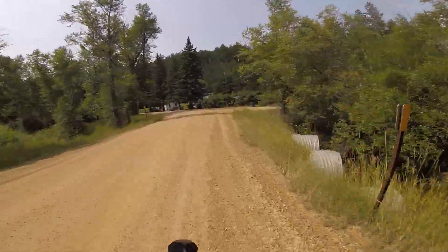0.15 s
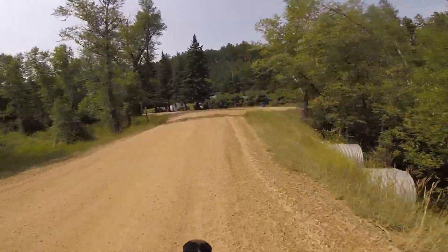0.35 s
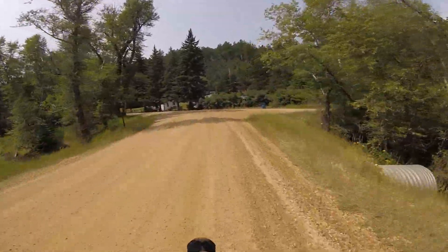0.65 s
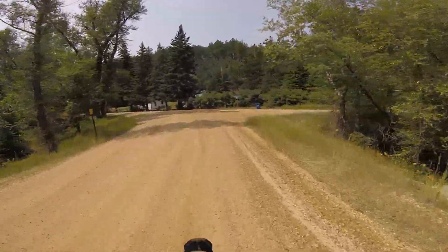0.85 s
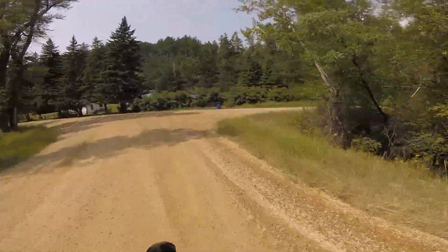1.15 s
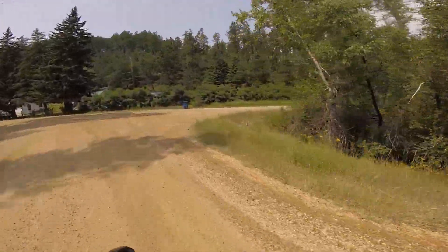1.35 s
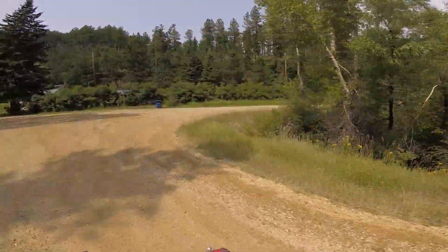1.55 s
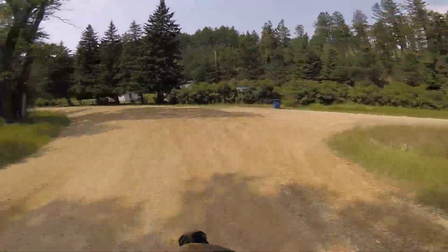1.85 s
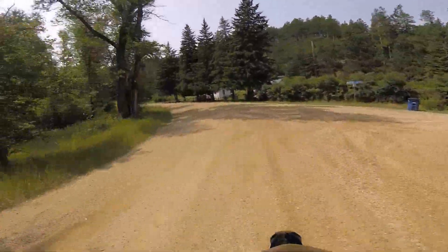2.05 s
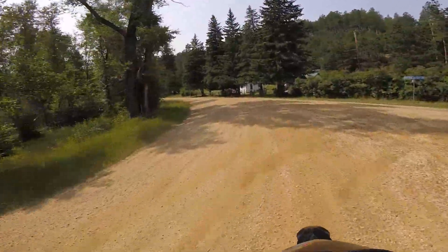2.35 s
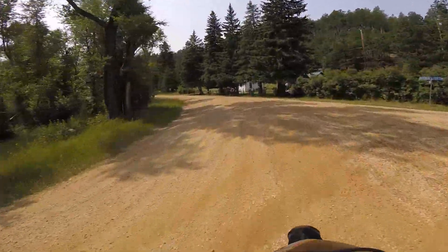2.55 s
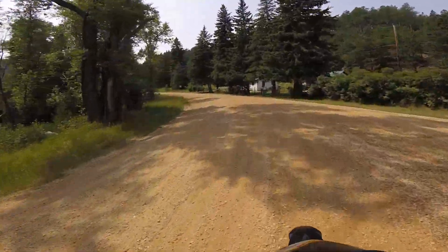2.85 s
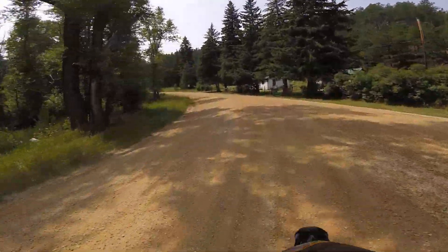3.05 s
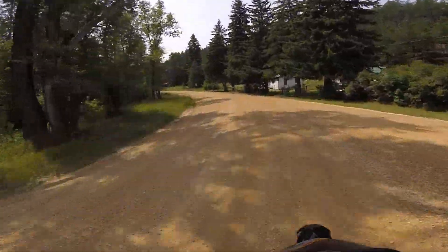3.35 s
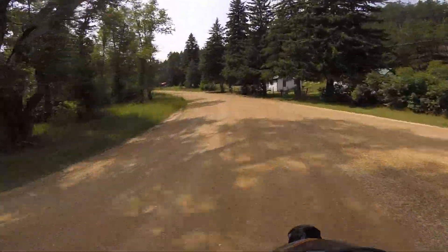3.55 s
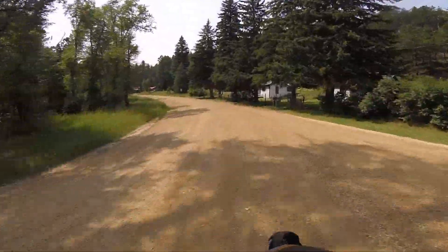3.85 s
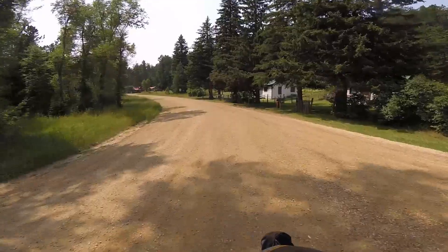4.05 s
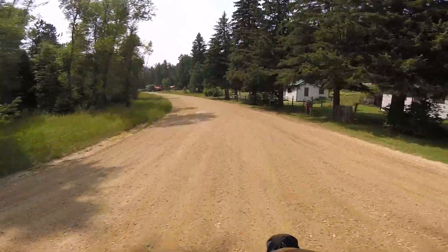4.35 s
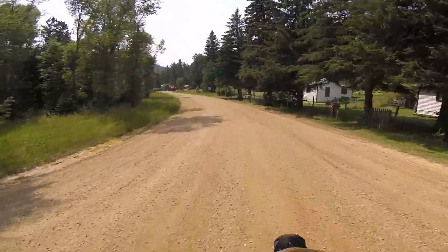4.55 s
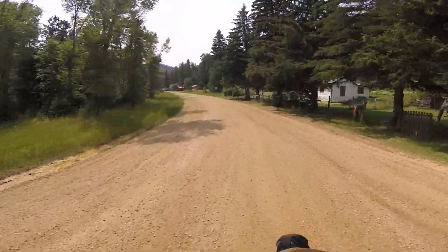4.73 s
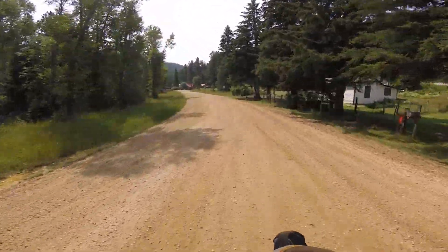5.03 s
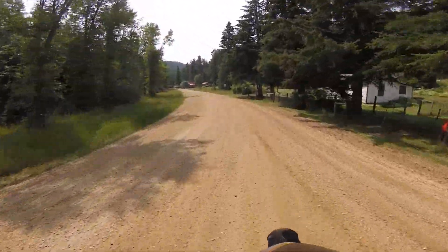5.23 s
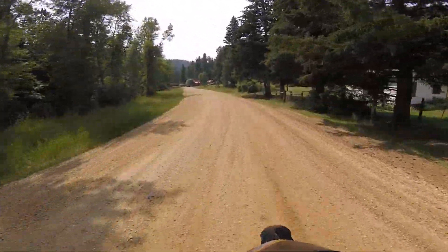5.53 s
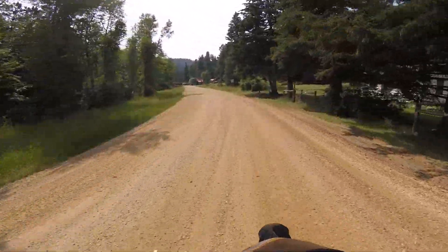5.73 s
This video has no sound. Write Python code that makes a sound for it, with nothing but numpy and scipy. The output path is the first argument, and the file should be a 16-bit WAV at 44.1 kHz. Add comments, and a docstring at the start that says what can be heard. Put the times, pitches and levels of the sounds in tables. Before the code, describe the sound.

A single-cylinder motorcycle runs along a gravel road, heard close from the rider, with engine clatter, a soft tyre crunch and low wind rumble throughout. In the first half second the revs fall, the chain rattles, grit ticks and a rush of air begins to fade. At about 0.5 seconds the engine barks in a quick downshift rev. It then coasts with a faint gear whine, slowing, firing weakly and skipping beats, with a few small exhaust pops until about 2.2 seconds. Stones knock the frame several times between 0.7 and 2.7 seconds, most clearly around 2.3. The wind buffets a little harder near 2 seconds. From about 2.4 seconds the throttle opens and the exhaust becomes a harder, even thumping, which rises slowly in pitch from around 3 seconds until the end, just before 6 seconds.

```python
"""Motorcycle on a gravel bend

A single-cylinder four-stroke bike, heard from a microphone on the rider. Each firing rings the exhaust
pipe. The engine revs briefly for a downshift, coasts into a bend, firing weakly and skipping beats, then
pulls out under throttle. Valves clatter, tyres crunch, wind buffets, the chain rattles, stones knock."""
import sys
import numpy as np
from scipy import signal
from scipy.fft import rfft, irfft, next_fast_len
from scipy.io import wavfile
from scipy.ndimage import uniform_filter1d, minimum_filter1d, map_coordinates

SR = 44100
rng = np.random.default_rng(int(sys.argv[2]) if len(sys.argv) > 2 else 0)


def unload_audio(sound):
    """Save the sound as a 16-bit wav file, at the path given as the first command line argument."""
    columns = np.transpose(np.atleast_2d(sound))
    # keep every value between -1 and 1, then stretch to whole-number steps
    steps = np.round(np.clip(columns, -1, 1) * 32767)
    wavfile.write(sys.argv[1], SR, steps.astype(np.int16))


N = 259742


def amp(db):
    """Turn decibels into a gain."""
    return 10 ** (np.asarray(db) / 20)


def unit(x):
    """Scale to an average (rms) level of 1."""
    return x / np.sqrt(np.mean(x ** 2) + 1e-20)


def curves(rows):
    """Join a table's timed points with straight lines: one curve for each column after the time."""
    times, *columns = np.transpose(rows)
    return [np.interp(np.arange(N) / SR, times, column) for column in columns]


def wobble(rate_hz):
    """A smooth random curve with rate_hz new values a second."""
    points = rng.standard_normal(int(N * rate_hz / SR) + 4)
    return map_coordinates(points, [np.arange(N) * rate_hz / SR])


def swell(peak_s, length_s):
    """A smooth rise and fall around one moment."""
    return np.exp(-((np.arange(N) / SR - peak_s) / length_s) ** 2)


def filtered(x, response):
    """Scale each frequency in x by response(hz)."""
    size = next_fast_len(N + SR // 2)
    return irfft(rfft(x, size) * response(np.fft.rfftfreq(size, 1 / SR)), size)[:N]


def coloured(x, points):
    """Shape the tone of x with (pitch_hz, level_db) points, then scale it to level 1."""
    pitch_hz, db = np.transpose(points)
    return unit(filtered(x, lambda hz: amp(np.interp(np.log(hz + 1), np.log(pitch_hz), db))))


def ringing(x, modes):
    """x plus the ring it stirs up in a few (pitch_hz, width_hz, level_db) resonances."""
    def response(hz):
        return sum(amp(db) / (1 + 2j * (hz - centre) / width) for centre, width, db in modes)
    return x + filtered(x, response)


# How fast the engine runs, in cycles a second: time_s, speed_hz
ENGINE_SPEED = [(0.0, 27.512), (0.39, 20.642), (0.47, 22.386), (0.56, 30.927), (0.74, 31.075),
                (1.65, 27.515), (2.62, 25.369), (2.93, 25.771), (3.2, 25.181), (4.2, 26.672),
                (5.35, 27.971), (5.89, 29.529)]
def engine_cycles():
    """Cycles done so far, surging a little with the road; the exhaust beats near each whole number."""
    return .435 + np.cumsum(curves(ENGINE_SPEED)[0]) / SR + .004 * wobble(6)


# The throttle, from 0 (shut) to 1 (wide open): time_s, opening
THROTTLE_OPENING = [(0, 1), (.15, 0.2), (.42, 0), (.49, 0.8), (.6, 0), (1.5, 0.13), (1.8, 0.51), (2.1, 0.3),
                    (2.4, 0.9), (2.8, 0.89), (3.05, 0.97)]
def controls(cruise_hz=27):
    """The throttle opening, and how much faster than cruising the engine runs."""
    return np.clip(curves(THROTTLE_OPENING)[0], 0, 1), curves(ENGINE_SPEED)[0] - cruise_hz


# Runs of cycles that fail to fire properly: start_s, cycle_count, drop_db
MISFIRES = [(.14, 2, -6), (.26, 4, -13.5), (.56, 1, -4.5), (.75, 1, -19), (.92, 1, -9), (1.02, 1, -3.5),
            (1.15, 1, -8.5), (1.26, 3, -4), (1.43, 1, -17), (1.5, 2, -4.5), (1.82, 1, -18),
            (1.94, 3, -12.5), (2.24, 2, -6.5), (2.43, 1, -5)]
def misfire_drop(cycles):
    """The drop in decibels during each failed cycle, and 0 elsewhere."""
    cycle, drop_db = np.floor(cycles + .25), np.zeros(N)
    for start_s, count, db in MISFIRES:
        first = cycle[round(start_s * SR)]
        drop_db[(cycle >= first) & (cycle < first + round(count))] = db
    return drop_db


# How strongly the fuel burns: time_s, level_db
BURN_STRENGTH = [(0, -3), (.2, 2), (.44, -1), (.6, 0.5), (.85, -2), (1.15, 0), (1.4, -2), (1.7, -3.5),
                 (2.0, -4), (2.4, -3.5), (2.6, -3), (2.9, -3), (4, -3.5), (5.89, -4)]
def firings(cycles, uneven_db=2.5, misfire_lag_s=0.0022, lean_lag_s=0.00083):
    """One push of gas a cycle, uneven on a shut throttle; failed or fuel-starved burns come late."""
    beats = np.flatnonzero(np.diff(np.floor(cycles + 0.0954)))
    opening, faster_hz = controls()
    closed, drop_db = np.sqrt(1 - opening[beats]), misfire_drop(cycles)[beats]
    starved = closed * np.clip(1 - faster_hz[beats] / 2.8, 0, 1)
    scatter_db = uneven_db * starved * abs(rng.standard_normal(len(beats)))
    burn_db = curves(BURN_STRENGTH)[0][beats] + drop_db - scatter_db
    for start_s, change_db, *_ in HARD_FIRINGS:
        burn_db[np.argmin(abs(beats / SR - start_s))] += change_db
    late_s = abs(misfire_lag_s * rng.standard_normal(len(beats))) * (drop_db < 0) + lean_lag_s * closed
    pushes = np.zeros(N + SR)
    pushes[beats + np.round(late_s * SR).astype(int)] = amp(burn_db)
    return pushes[:N]


def pipe_ring(modes, steep, size=16384):
    """The pipe's ring after one push; steeper resonance peaks make it start more softly."""
    hz = np.fft.rfftfreq(size, 1 / SR)
    gain = sum(amp(db) / (1 + (2 * (hz - centre) / width) ** 2 / steep) ** steep
               for centre, width, db in modes)
    cepstrum = irfft(np.log(gain * (hz + 1) / np.hypot(hz + 1, 35)))
    # Fold it so that the ring comes only after the push.
    cepstrum[1:size // 2] *= 2
    cepstrum[size // 2 + 1:] = 0
    return irfft(np.exp(rfft(cepstrum)))


def play_rings(pushes, ring, pitch_ratio, waver):
    """Each push plays the ring, sped up or slowed down to change its pitch."""
    ring, out = ring[:SR // 6], np.zeros(N + SR)
    steps = np.arange(len(ring))
    for beat in np.flatnonzero(pushes):
        speed = pitch_ratio[beat] + waver * rng.standard_normal()
        out[beat:][:len(ring)] += pushes[beat] * np.interp(steps * speed, steps, ring)
    return out[:N]


# The pipe's notes with the throttle shut: pitch_hz, width_hz, level_db
SHUT_NOTES = [(60, 63, -22.5), (122, 51.4, -3), (205, 60, -14), (281.8, 42, 3), (467, 60, -22.5),
              (560, 40, -25), (712, 26, -23.5), (1000, 30, -30)]
# Its notes with the throttle open: pitch_hz, width_hz, level_db
OPEN_NOTES = [(55.3, 18.5, 0), (79, 40, -21.5), (113.2, 45, -3), (164.8, 29.8, -1.5), (209.8, 71.6, -4),
              (271, 19.4, -1.5), (308, 39.5, 3)]
# Its higher notes, which rasp under throttle: pitch_hz, width_hz, level_db
RASP_NOTES = [(490, 54, -11.5), (604, 36, -20)]
def exhaust(cycles, shut_db=34.0, open_db=35.0, rasp_db=35.5, shut_flow_db=-54, open_flow_db=-66):
    """Firings and swirling gas ring the pipe; opening the throttle makes it harder and more even."""
    opening, faster_hz = controls()
    pushes, flow, closed = firings(cycles), rng.standard_normal(N), np.sqrt(1 - opening)
    # Coasting cools the pipe, so its note sags a little.
    cool_s, sag_share = 1, 0.026
    cool_step = 1 / (cool_s * SR)
    heat = signal.lfilter([cool_step], [1, cool_step - 1], opening - 1) + 1
    shut_ring = pipe_ring(SHUT_NOTES, steep=1.39)
    coasting = play_rings(pushes * closed, shut_ring, 1 + sag_share * (heat - .5), waver=0.01)
    coasting += amp(shut_flow_db) * signal.fftconvolve(flow * closed, shut_ring)[:N]
    open_gas = (pushes + amp(open_flow_db) * flow) * opening
    pulling = signal.fftconvolve(open_gas, pipe_ring(OPEN_NOTES, steep=1.83))[:N]
    # The rasp gets louder and higher as the engine speeds up.
    rasp_pushes = pushes * opening * amp(0.6 * faster_hz)
    rasp = play_rings(rasp_pushes, pipe_ring(RASP_NOTES, steep=1.35), 1 + 0.007 * faster_hz, waver=0)
    return amp(shut_db) * coasting + amp(open_db) * pulling + amp(rasp_db) * rasp


# How loudly gas sloshes in the pipe: time_s, level_db
SLOSH_LEVEL = [(0, -22), (.2, -22.5), (.42, -22.5), (.6, -28.5), (1.2, -27), (1.6, -24), (2.1, -23.5),
               (2.8, -23.5), (3.2, -27.5), (3.9, -26), (4.5, -27), (5.89, -32.5)]
# How far it runs ahead of the beat, most while coasting: time_s, lead_cycles
SLOSH_AHEAD = [(0, .04), (.18, .105), (1.2, .105), (1.9, .085), (2.4, .035), (5.89, .03)]
def gas_slosh(cycles, swings=3.313, damping=2.77, uneven_db=1.27, jitter=0.0074):
    """A low rumble: fired or not, the piston shoves the gas once a cycle and it swings a few times."""
    phase = (cycles + curves(SLOSH_AHEAD)[0] + jitter * wobble(22)) % 1
    slosh = np.sin(2 * np.pi * swings * phase) * np.sin(np.pi * phase) ** 0.55 * np.exp(-damping * phase)
    return amp(curves(SLOSH_LEVEL)[0] + uneven_db * wobble(14)) * unit(slosh)


def strokes(cycles, places):
    """Bursts of varying strength in every cycle, each given as (place_cycles, length_cycles, size)."""
    bursts = sum(size * np.exp(-(((cycles - place + .5) % 1 - .5) / length) ** 2)
                 for place, length, size in places)
    return bursts * amp(2.4 * wobble(45))


def case_ring(x, fade_s=0.0099, share=0.91, lowest_hz=1500):
    """The metal engine cases add a short ring of many close, high notes."""
    t = np.arange(SR // 16) / SR
    tail = rng.standard_normal(len(t)) * amp(-60 * t / fade_s)
    ring = signal.fftconvolve(x, tail / np.linalg.norm(tail))[:N]
    return x + share * filtered(ring, lambda hz: hz ** 4 / (hz ** 4 + lowest_hz ** 4))


# The tone of the clatter: pitch_hz, level_db
CLATTER_TONE = [(150, -5.5), (300, 12.5), (420, 4), (700, -1.8), (850, -0.7), (1050, -3.5), (1300, -12.5),
                (1600, -14.5), (2100, -21), (2600, -21), (3500, -38.5), (6000, -35), (12000, -73.5)]
# The notes of the cooling fins and engine covers: pitch_hz, width_hz, level_db
FIN_NOTES = [(639, 23, -3), (1051, 13, -2.5), (1839, 5.2, 5.5), (2560, 21, -6)]
def clatter(cycles, level_db=-38.5, load_db=1.6, shake=0.4, coasting=0.45):
    """Valves and piston rattle the cases, more under throttle and on rough gravel; the fins ring on."""
    road_db, opening = curves(GRAVEL_LEVEL)[0], controls()[0]
    slaps = strokes(cycles, [(.64, 0.016, 0.5), (.73, 0.027, 0.58), (.9, 0.13, 1)])
    pulse = 1 + (coasting + (1 - coasting) * opening) * slaps
    cases = case_ring(pulse * coloured(rng.standard_normal(N), CLATTER_TONE))
    gain = amp(level_db + load_db * (opening - 0.5) + shake * (road_db - road_db.mean()))
    return gain * unit(ringing(cases, FIN_NOTES))


# The tone of the valve ticks: pitch_hz, level_db
VALVE_TONE = [(1200, -19), (2600, -2), (3900, 0), (6000, -20), (7200, -17), (10500, -25), (12000, -44)]
def valve_ticks(cycles, level_db=-67, rise_db_per_hz=1.5):
    """The arms that open the valves tick three times a cycle, louder with engine speed and throttle."""
    opening, faster_hz = controls()
    pulse = strokes(cycles, [(.64, 0.036, 0.96), (.72, 0.041, 1), (.87, 0.11, 0.45)])
    ticks = pulse * coloured(rng.standard_normal(N), VALVE_TONE)
    return amp(level_db + rise_db_per_hz * faster_hz) * (0.1 + 0.57 * opening) * unit(case_ring(ticks))


# How the gravel noise rises and falls: time_s, level_db
GRAVEL_LEVEL = [(0.02, -60), (0.12, -62), (0.77, -62.5), (1.6, -65), (2.13, -66.5), (2.46, -64), (3.2, -67),
                (3.84, -69.5), (4.1, -68.5), (4.6, -64.8), (5.86, -64.3)]
# The tone of tyres on gravel: pitch_hz, level_db
GRAVEL_TONE = [(500, -17.5), (1500, 8.5), (2600, -1), (3400, -2.5), (3900, -6), (5000, -7), (5800, -22.5),
               (7000, -12), (7800, -19), (9500, -27), (10800, -30), (11800, -43), (14000, -66)]
def tyres(gain_db=11.0, crunch=0.6, stones_per_s=2500):
    """Gravel crunches under the tyres: an even hiss with many tiny clicks."""
    clicks = (rng.random(N) < stones_per_s / SR) * rng.uniform(-0.88, 1, N)
    gain = amp(curves(GRAVEL_LEVEL)[0] + gain_db + 0.32 * wobble(25))
    return gain * coloured(rng.standard_normal(N) + crunch * unit(clicks), GRAVEL_TONE)


# The deep tone of the wind: pitch_hz, level_db
WIND_TONE = [(10, -30), (25, -2.5), (45, 5), (75, 2), (130, -0.5), (210, -1), (400, -17), (900, -42),
             (2500, -120)]
def wind(level_db=-35.5, gust_db=2.5, bend_db=3.5):
    """Wind rumbles in soft lumps on the microphone, more while the rider leans through the bend."""
    bend = swell(peak_s=1.8, length_s=0.8)
    gain = amp(level_db + bend_db * bend + gust_db * np.tanh(wobble(5.3)))
    return gain * coloured(rng.standard_normal(N), WIND_TONE)


# The tone of the passing air: pitch_hz, level_db
AIR_TONE = [(200, -14), (550, 1.5), (1600, 1.5), (3000, -9), (5600, -29.5), (9000, -36.5), (12000, -43)]
def air_hiss(level_db=-47, fade_s=0.56):
    """Air hisses past at first and dies away as the rider slows."""
    gain = amp(level_db + 0.53 * wobble(7.7)) * swell(0, fade_s)
    return gain * coloured(rng.standard_normal(N), AIR_TONE)


def hits(rows, fade_s, spread, gain_db, attack_s):
    """Short bursts of noise, each around its own pitch, falling 60 dB in fade_s."""
    out, t = np.zeros(N + SR), np.arange(SR // 8) / SR
    hz = np.fft.rfftfreq(len(t), 1 / SR) + 1
    attack = 1 - np.exp(-(t / attack_s) ** 2)
    for start_s, level_db, pitch_hz in rows:
        band = np.exp(-(np.log(hz / pitch_hz) / spread) ** 2)
        noise = unit(irfft(rfft(rng.standard_normal(len(t))) * band, len(t)))
        out[round(start_s * SR):][:len(t)] += amp(level_db + gain_db - 60 * t / fade_s) * noise * attack
    return out[:N]


# Rattles of the chain: start_s, level_db, pitch_hz
CHAIN_RATTLES = [(.05, -43, 2000), (.165, -37, 1400), (.486, -31.5, 1400), (.523, -36.5, 1300),
                 (2.46, -40, 1300)]
def chain():
    """The chain rattles over bumps and as it pulls tight."""
    return hits(CHAIN_RATTLES, fade_s=0.077, spread=0.66, gain_db=2.5, attack_s=0.0025)


# Bits of flying grit: start_s, level_db, pitch_hz
GRIT_TICKS = [(.086, -58, 5840), (.169, -59, 5450), (.354, -62, 6700), (.495, -56, 6200)]
def grit():
    """Grit flung against metal makes tiny, bright ticks."""
    return hits(GRIT_TICKS, fade_s=0.04, spread=0.33, gain_db=5.0, attack_s=0.00023)


# Firings that bark, with the change to their burn: start_s, change_db, level_db, pitch_hz
HARD_FIRINGS = [(.213, -5, -37, 442), (.488, 2.5, -17, 456), (.524, 2.5, -21.5, 443),
                (1.183, -1.5, -40, 500), (1.394, 2, -38, 480), (1.604, 0, -27, 420), (1.786, 7.5, -31, 400),
                (1.899, 3.5, -36, 450), (2.084, 4.5, -40, 452), (2.2, 1, -41, 454)]
def barks():
    """Each hard firing spits a short, rough burst out of the pipe."""
    bursts = [(start_s, level_db, pitch_hz) for start_s, _, level_db, pitch_hz in HARD_FIRINGS]
    return hits(bursts, fade_s=0.044, spread=0.52, gain_db=3.0, attack_s=0.002)


def brake(level_db=-62, pitch_hz=4200, width_hz=250):
    """The brake pads rub the disc briefly before the bend."""
    rub = filtered(rng.standard_normal(N), lambda hz: np.exp(-((hz - pitch_hz) / width_hz) ** 2))
    return amp(level_db + 3.3 * wobble(21)) * swell(peak_s=0.26, length_s=0.051) * unit(rub)


def gear_whine(cycles, teeth=50, level_db=-52):
    """Gear teeth whine faintly after the downshift, while the wheel drives the engine."""
    gain = amp(level_db + 1.8 * wobble(4.2)) * swell(peak_s=.9, length_s=0.42)
    return gain * np.sin(2 * np.pi * teeth * cycles + wobble(110))


# Stones hitting the frame: start_s, level_db, pitch_hz
STONE_HITS = [(.680, -29.5, 1014), (.922, -48.5, 2480), (1.392, -43, 2470), (1.495, -31.5, 1000),
              (2.231, -25, 865), (2.394, -30, 1040), (2.733, -43.5, 1086)]
# The notes of the struck frame: pitch_hz, width_hz, level_db
FRAME_NOTES = [(480, 120, 4), (890, 73, -6), (1330, 200, 0), (1780, 170, 3.5)]
def stone_knocks():
    """Stones knock the frame and make it ring."""
    knocks = hits(STONE_HITS, fade_s=0.046, spread=0.45, gain_db=-5.5, attack_s=0.00049)
    return ringing(knocks, FRAME_NOTES)


def scene():
    """Engine, road and wind, added into one channel."""
    cycles = engine_cycles()
    gas = exhaust(cycles) + gas_slosh(cycles) + barks()
    machinery = chain() + clatter(cycles) + valve_ticks(cycles) + gear_whine(cycles) + brake()
    road = stone_knocks() + grit() + tyres()
    return (gas + machinery + road + wind() + air_hiss())[None]


def record(dry, limit=.27, smooth_samples=220, release_db_per_s=200, top_hz=14200):
    """A limiter turns loud peaks down and recovers quickly; the highest treble is cut off."""
    over_db = np.maximum(20 * np.log10(abs(dry[0]) / limit + 1e-9), 0)
    recovery_db = release_db_per_s * np.arange(N) / SR
    cut_db = np.maximum.accumulate(over_db + recovery_db) - recovery_db
    gain = uniform_filter1d(minimum_filter1d(amp(-cut_db), smooth_samples), smooth_samples)
    return filtered(dry[0] * gain, lambda hz: hz < top_hz)[None]


dry = scene()
out = record(dry)
unload_audio(out)
```